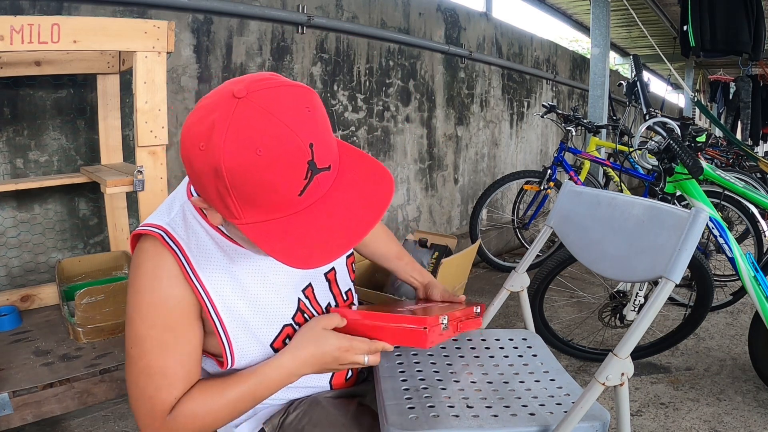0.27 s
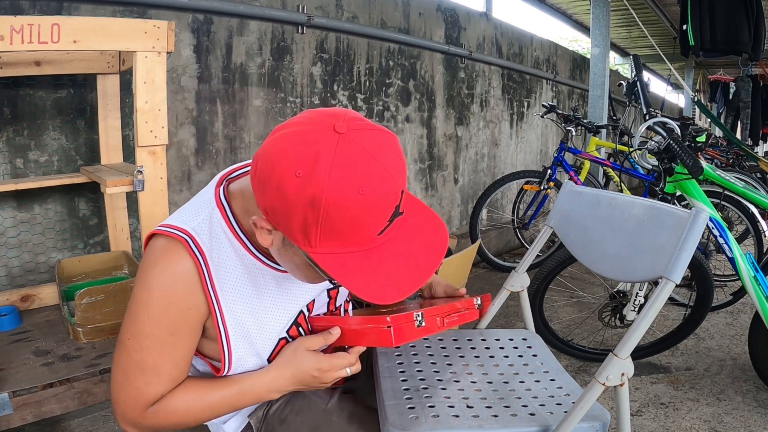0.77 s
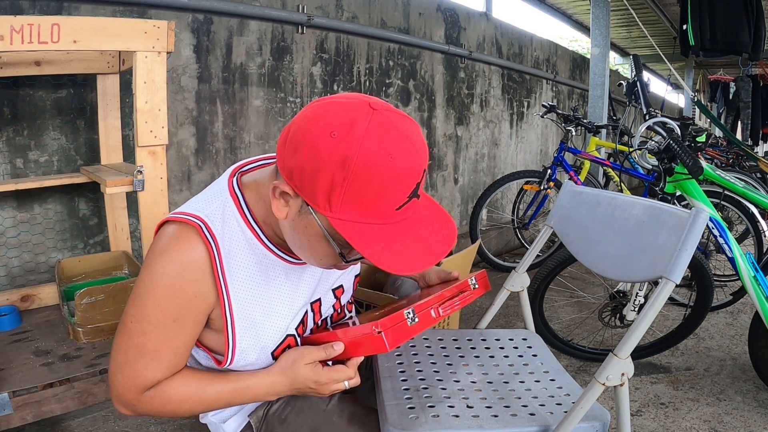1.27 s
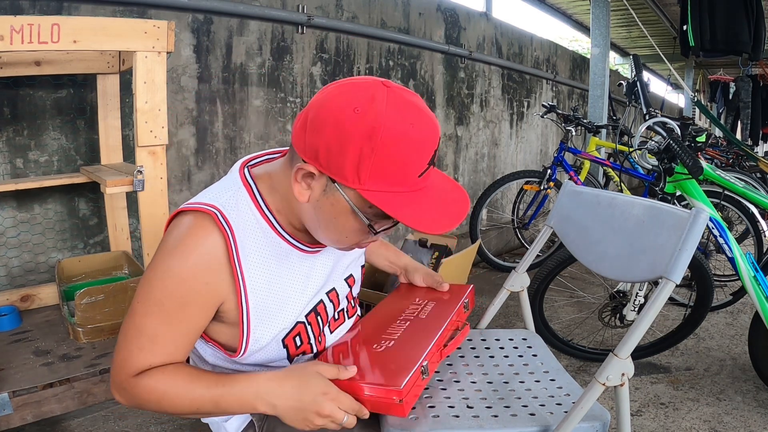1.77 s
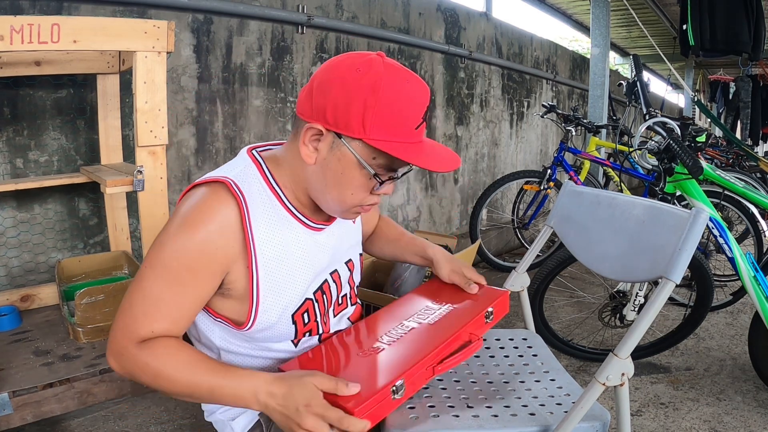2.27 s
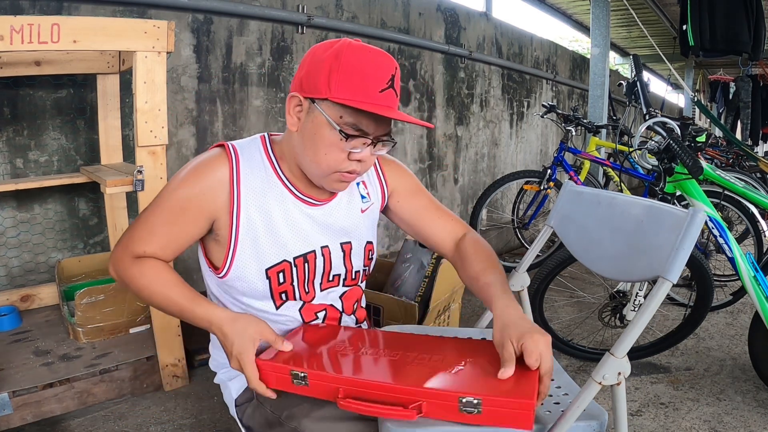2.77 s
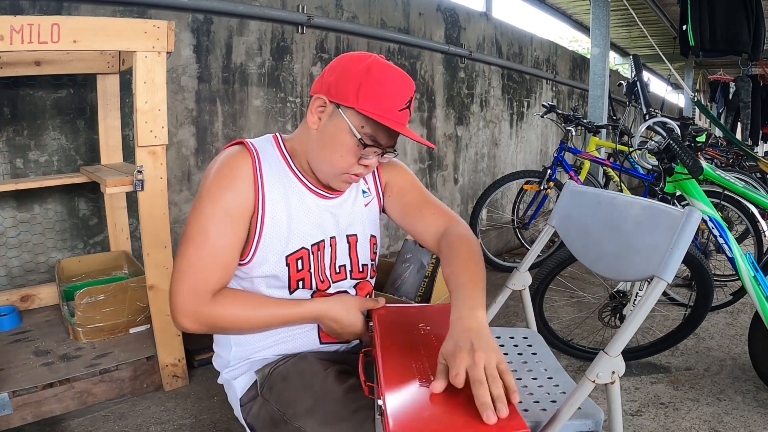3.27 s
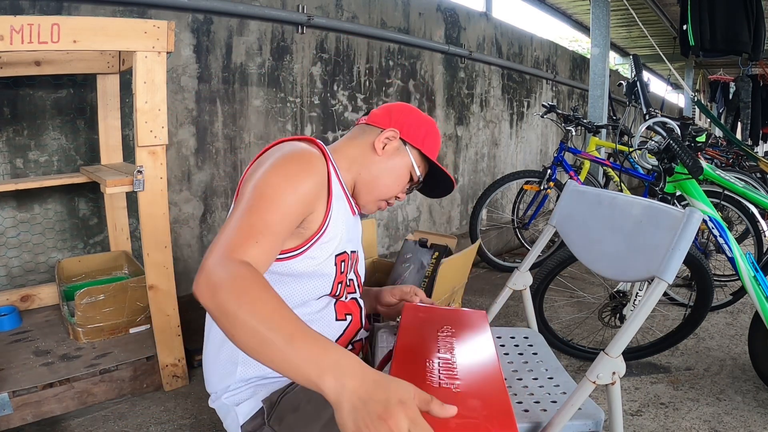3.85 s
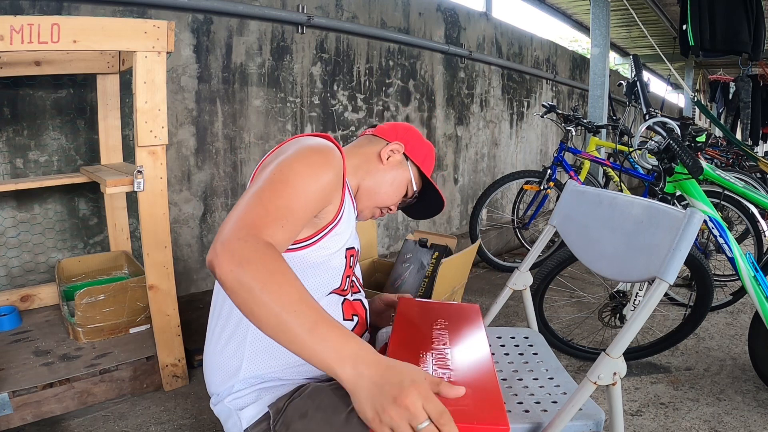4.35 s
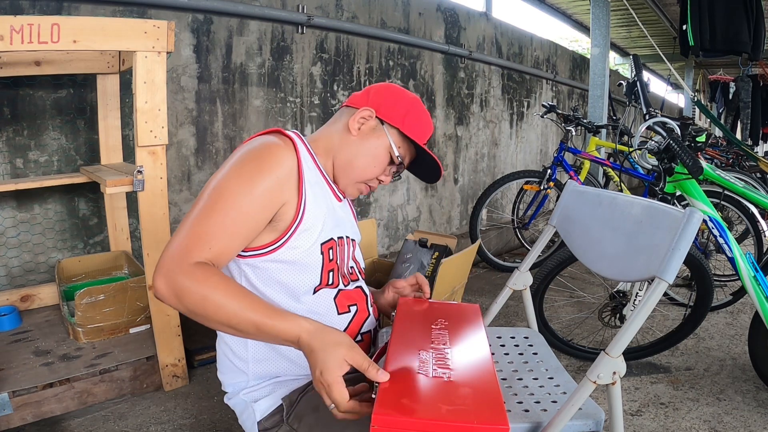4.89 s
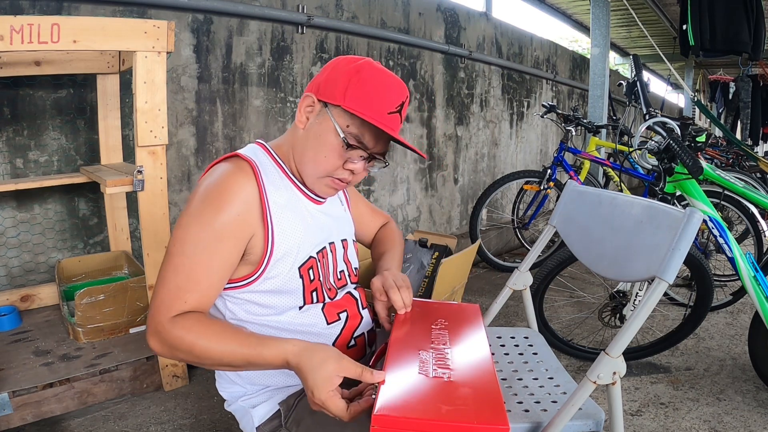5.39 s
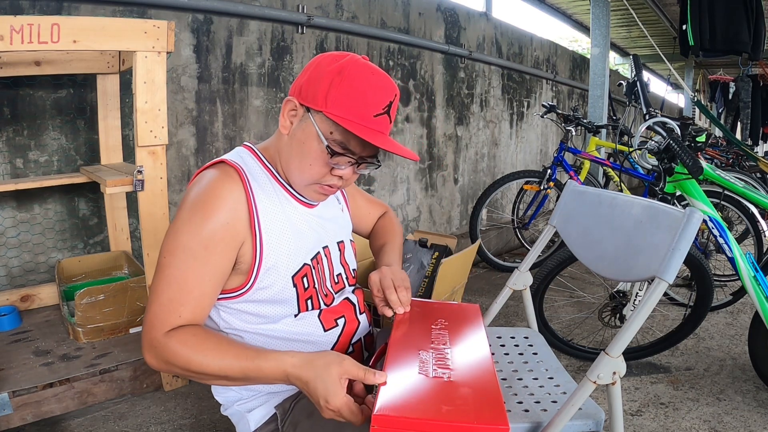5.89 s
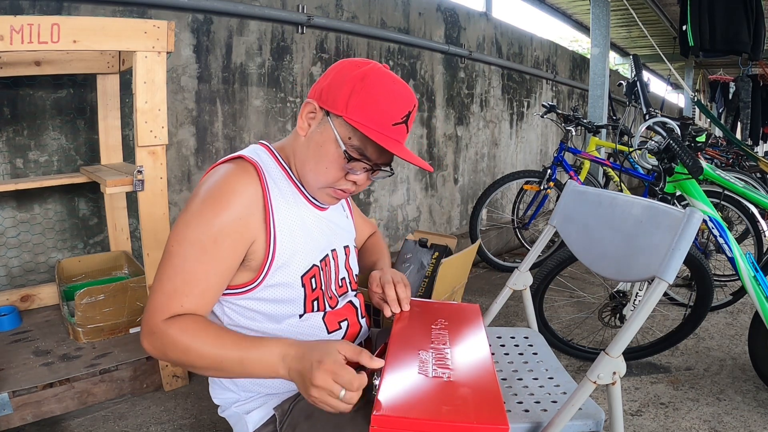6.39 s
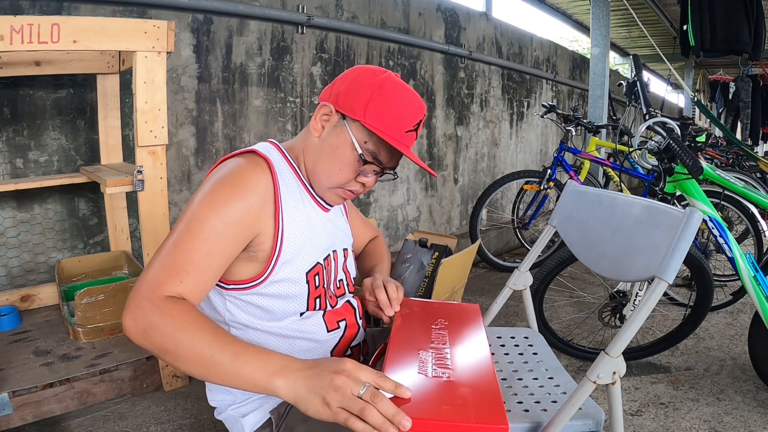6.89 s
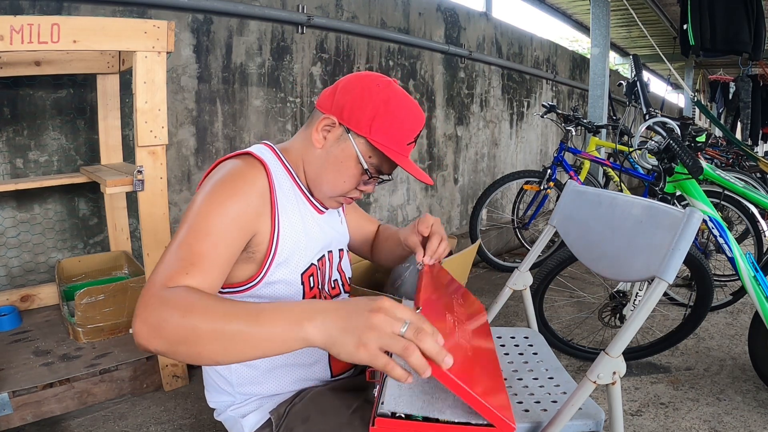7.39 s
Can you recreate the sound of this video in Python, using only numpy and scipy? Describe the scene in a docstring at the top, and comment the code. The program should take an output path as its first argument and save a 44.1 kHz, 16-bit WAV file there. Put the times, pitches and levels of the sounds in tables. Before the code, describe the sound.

A sheet-metal tool case is handled close by, each knock followed by a short rattle of steel tools inside. A quick cluster of clanks comes at 0.2 seconds, a loud one at 1.5 and another at 2.1, then lighter knocks. From about 2.7 to 3.2 seconds the case scrapes across a plastic seat, which gives a short hollow groan, strongest near 3.1. The loudest clatter comes around 3.5 seconds as the case settles. A small knock and a weaker groaning drag follow between 3.9 and 4.5. After a pause, two sharp metallic latch clacks sound at about 5.7 and 6 seconds. Soft knocks follow near 6.9, and a faint tap at 7.5. The place is a covered outdoor area with a short, slight echo. A low, throbbing machine drone and a dull wash of distant traffic continue throughout.

```python
"""Steel tool case on a plastic seat

A sheet-metal tool case is turned, set down, dragged and unlatched under an open roof. Each knock is
an impact and a short rattle of the steel tools inside, which excite the damped modes of panels and
tools. In dragging, stick-slip friction drives the resonances of the seat, and it groans.
Wall and roof return a short echo; a machine drones nearby over a dull city wash."""
import sys
import numpy as np
from scipy import signal
from scipy.fft import rfft, irfft
from scipy.io import wavfile
from scipy.ndimage import uniform_filter1d

SR = 44100
rng = np.random.default_rng(int(sys.argv[2]) if len(sys.argv) > 2 else 0)


def wrap_up_sound(samples):
    """Save the sound to the file named by the first command line argument, as 16-bit audio."""
    columns = np.atleast_2d(samples).T
    # keep every value between -1 and 1, then stretch to whole-number steps
    tamed = np.clip(columns, -1, 1)
    steps = np.round(tamed * 32767).astype(np.int16)
    wavfile.write(sys.argv[1], SR, steps)


N = 336924

# Impacts on the case: t/s, level/dB, relative thud, brightness and treble levels/dB, panel f/Hz,
# struck part f/Hz, contact rise/ms, rattle T60/s, relative rattle level/dB
KNOCKS = [(.12, -25, 11.5, -15, -33, 376, 2740, 1.4, 0.2, -21.5),
          (.2036, -8.5, 4, -7, -25, 396, 3350, 0.86, .23, -24.5),
          (0.2194, -9.5, -4, -6, -11.5, 456, 2920, 1.1, 0.14, -24),
          (.306, -21, 11, -9, -26, 390, 2600, 3.1, 0.19, -28.5),
          (1.5404, -3, 1.5, -5, -28, 501, 5000, 0.3, 0.34, -26.5),
          (1.5805, -13.5, 10.5, -9, -13, 620, 1750, 0.84, .38, -27),
          (1.597, -18, 14.5, -6, -25, 322, 2280, 4.5, 0.16, -21),
          (1.62, -22, 11.5, -9, -26, 370, 1570, 5, 0.17, -11.5),
          (1.657, -28, 15, -8, -26, 400, 2480, 3, 0.12, -15),
          (2.1195, -11, 7.5, -6, -15.5, 549, 2730, 2, 0.13, -16.5),
          (2.1402, -9.5, 3.5, -3, -10, 433, 2840, 2.4, 0.21, -21.5),
          (2.39, -37, 18, -8, -26, 904, 2500, .8, .18, -27),
          (2.4402, -24.5, 9.5, -15, -34, 440, 2740, 0.98, 0.38, -30),
          (2.523, -21.5, 3, -7, -38, 367, 3550, 3.4, 0.15, -20.5),
          (2.7408, -21.5, 11, -8, -19, 387, 2650, 1., 0.21, -17),
          (2.826, -21, -9, -4, -14.5, 455, 3600, 2.1, 0.52, -27),
          (2.9403, -16.5, -6, -8, -16, 473, 4100, 1.5, 0.051, -11),
          (3.3155, -20.5, 7.5, -11, -32, 586, 1940, 1.8, 0.34, -15),
          (3.337, -26, 3, -2, -14, 500, 5000, 4, 0.15, -12),
          (3.366, -24.5, 8, 0.5, -10, 424, 1280, 3.5, 0.095, -13.5),
          (3.4681, -13, 3.5, -3, -9, 350, 3200, 1.6, 0.29, -15),
          (3.4826, -2.5, -5, 1, -6, 727, 3830, 3.3, 0.18, -20.5),
          (3.498, -11, 4, -3, -5, 490, 2200, 2.7, 0.2, -21.5),
          (3.516, -3, -8, -1, -11.5, 420, 3370, 3, 0.19, -22),
          (3.535, -12, 1, 0, -16, 500, 4500, 6.1, 0.15, -27),
          (3.553, -15, 1, -11, -27, 700, 2200, 2.3, .25, -23),
          (3.9188, -21.5, 5, -11, -21, 1090, 2770, 0.88, 0.2, -20.5),
          (4.2772, -40, 19, -7, -1, 465, 1300, 2.9, .12, -37),
          (4.334, -28, 9.5, -8, -26, 477, 2000, 3.7, 0.23, -24),
          (5.66, -18.5, 2.5, -19, -19, 450, 3230, 7.7, 0.23, -15.5),
          (5.675, -5.5, -7, -4.5, -19.5, 684, 2760, 2.2, .16, -25.5),
          (5.985, -4, 3, -6.5, -14, 403, 2070, 2.3, 0.18, -19.5),
          (6.014, -12.5, 8.5, -2, -13, 520, 2800, 3, 0.26, -29.5),
          (6.034, -20, 6, -10, -24, 480, 3000, 2.6, .2, -32),
          (6.0817, -20.5, 10.5, -15, -38, 480, 1300, 0.98, 0.47, -27),
          (6.844, -20.5, 12.5, -14, -40, 485, 2380, 2, 0.086, -14.5),
          (6.88, -27.5, 5, -8, -14, 413, 3000, 2.4, 0.28, -22),
          (6.946, -18.5, 7.5, -12, -28, 480, 3140, 2.2, 0.18, -16),
          (7.079, -41, 20.5, -11, -21, 347, 1810, 1.3, .22, -25),
          (7.519, -35, 13, -9, -22, 342, 1500, .8, 0.12, -23)]


def knocks():
    """Linear response: each knock is the force of blow and rattle convolved with the case's response."""
    out, t = np.zeros((2, N + SR)), np.arange(int(.22 * SR)) / SR
    tumbling = undb(2 * walk(120))
    for s, db, thud_db, bright_db, treble_db, panel_hz, part_hz, rise_ms, t60, rattle_db in KNOCKS:
        i = int(s * SR)
        pan_db = .3 * rng.standard_normal() * np.array([[.5], [-.5]])
        response = case_response(t, thud_db, bright_db, treble_db, panel_hz, part_hz)
        force = blow(t, rise_ms) + undb(rattle_db) * np.resize(tumbling[i:], len(t)) * rattle(t, t60)
        out[:, i:i + 2 * len(t) - 1] += signal.fftconvolve(force, undb(db + pan_db) * response, axes=1)
    return out[:, :N]


def blow(t, rise_ms):
    """Contact force: the slower the contact, the weaker its click and the longer its chatter."""
    rise_s = rise_ms / 1000
    click = undb(-4.5 * rise_ms) * snap(t, 92, 9200)
    return click + crack(t, 88, 17000, t60=.022 + 6 * rise_s, rise_s=rise_s)


def rattle(t, t60):
    """Random collisions: loose tools land just after the blow, and the fine ticks settle first."""
    shared, left, right = (grains(len(t), per_s=9000, spread_db=2.2) for _ in range(3))
    coarse = band(shared, 100, 5000, order=1)
    # tools lie all along the case, so some ticks reach one side only
    one_sided = np.array([band(left, 4100, 15000), band(right, 4500, 15000)])
    fine = shared - coarse + undb(-4.5) * one_sided
    return rise(t, .0084) * decay(t, t60) * (coarse + decay(t, .3) * fine)


# Modes of the sheet-metal panels: f/Hz, relative level/dB, T60/s
PANEL_MODES = [(257, -13, 0.23), (297.7, 6.5, 0.2), (385, 7.5, 0.087), (456, 12, 0.061), (497, 1.5, 0.045),
               (700, 2.5, 0.051), (960, -17.5, 0.057), (998, 3.5, 0.12), (1190, -7.5, 0.024)]
# Modes of the sockets and bars: f/Hz, relative level/dB, T60/s
TOOL_MODES = [(1716, 3, 0.053), (1880, 12.5, 0.05), (2200, 8, 0.047), (2770, 9.5, .06), (3470, 5.5, 0.073),
              (3300, 1.5, 0.18), (4000, 5, 0.11), (5090, -1.5, 0.086), (5300, 6.5, 0.11),
              (6020, -11, 0.088), (6900, -17, .1), (7780, 1, .06), (8700, -3.5, .08), (9970, -6.5, 0.16),
              (10700, -13, .1), (11700, -11.5, .1)]


def case_response(t, thud_db, bright_db, treble_db, panel_hz, part_hz):
    """Modal superposition: panels give the lows of the impulse response, tools the highs."""
    tools = undb(-13) * ring(TOOL_MODES, t, spread_db=3)
    thud = snap(t, 206, 476) + undb(3.5) * snap(t, 614, 1270) + ring(PANEL_MODES, t, spread_db=2)
    thud += undb(-2.5) * snap(t, .823 * panel_hz, 1.037 * panel_hz)
    thud *= rise(t, .0019)  # the panels take a moment to swing
    middle = snap(t, 1470, 3310) + band(tools, 1000, 4000)
    middle += undb(-8.5) * snap(t, .868 * part_hz, 1.094 * part_hz)
    bright = snap(t, 3900, 6070) + undb(5.5) * band(tools, 3700, 5600)
    treble = snap(t, 6730, 9000) + undb(-9.5) * snap(t, 9300, 12500) + band(tools, 5500, 13000)
    body = undb(thud_db) * thud + middle + undb(bright_db) * bright + undb(treble_db) * treble
    # the case is wide, so its highs travel left and right by unlike paths
    side = undb(bright_db / 2 - 3) * crack(t, 1500, 4400, t60=.011)
    side += undb(treble_db - 2.5) * crack(t, 6000, 13000, t60=.015)
    return stereo(body, side)


# Touches that ring one panel or socket: t/s, f/Hz (the nearest mode sounds), relative level/dB
PINGS = [(.206, 460, -27), (.222, 5330, -41), (.246, 5090, -44), (1.478, 950, -36), (1.545, 510, -21),
         (1.581, 1000, -29), (1.586, 7780, -43), (1.652, 5090, -48), (1.664, 1000, -35), (1.672, 5090, -50),
         (2.122, 520, -18), (2.124, 2770, -31), (2.198, 5090, -46), (2.39, 950, -34), (2.744, 1200, -31),
         (2.942, 3950, -36), (3.105, 5090, -47), (3.317, 506, -27), (3.474, 5090, -29), (3.476, 6010, -31),
         (3.481, 700, -24), (3.483, 3950, -24), (3.486, 3500, -26), (3.497, 456, -26), (3.5, 5090, -31),
         (3.548, 1000, -32), (4.275, 950, -37), (5.676, 5090, -37), (5.679, 1690, -24), (5.987, 9970, -43),
         (5.99, 300, -23), (5.992, 1910, -27), (6.021, 9970, -45), (6.027, 5330, -39), (6.045, 5330, -42),
         (6.895, 5090, -48), (7.171, 3250, -50)]


def pings():
    """Damped vibration: a stuttering touch rings one mode as a cluster of three close frequencies."""
    out, t = np.zeros(N + SR), np.arange(int(.22 * SR)) / SR
    for s, near_hz, db in PINGS:
        hz, _, t60 = min(PANEL_MODES + TOOL_MODES, key=lambda mode: abs(mode[0] - near_hz))
        split_hz = (.01 * hz + 50) * rng.uniform(.6, 1)
        cluster = [(hz, 1), (hz + split_hz, .5), (hz - split_hz, .5)]
        pure = decay(t, t60) * sum(gain * np.sin(2 * np.pi * f * t) for f, gain in cluster)
        stutter = rng.standard_normal(len(t)) * decay(t, .04)
        rough = signal.fftconvolve(pure, stutter)[:len(t)]
        i = int(s * SR)
        out[i:i + len(t)] += undb(db) * unit(rough) * np.std(pure)
    return out[:N]


# Shoves: peak t/s, build-up/s, groan level/dB, upper mode level re groan/dB, scrape level/dB
SHOVES = [(2.755, 0.17, -42, -3, -37.5), (2.785, .04, -48, -3, -51.5), (2.82, 0.09, -46, -8, -58),
          (2.9, 0.052, -60, -9, -43.5), (2.955, .015, -41, 5, -43), (2.99, 0.037, -37, 3, -38),
          (3.02, .03, -34, 0, -50), (3.05, 0.038, -30, 0, -43), (3.072, 0.022, -22, -4, -44.5),
          (3.099, 0.033, -19.5, -8, -44), (3.138, .03, -41.5, 9, -53), (3.205, .018, -44, -1, -60),
          (3.25, 0.044, -55, 2, -60), (4.061, 0.034, -31, -13, -46.5), (4.105, 0.05, -36, -9, -59),
          (4.154, 0.078, -45, -1, -49), (4.278, 0.011, -34, -4.5, -45), (4.455, 0.057, -47, -7, -58)]
# Resonances of the hollow seat: f/Hz, bandwidth/Hz, relative level/dB
SEAT_MODES = [(450, 18.7, 9.5), (336, 94, -7.5), (763, 32, -12.5), (1030, 71, -12.5), (1437, 90, -21.5),
              (1746, 90, -23)]
# Spectrum of the scrape: f/Hz, relative spectral level/dB
SCRAPE_SPECTRUM = [(350, -18), (600, -8), (800, -9.5), (1040, 1), (1300, -11.5), (1600, -12.5), (2800, -16),
                   (5010, -26.5), (8000, -35), (14000, -56.5)]


def drags():
    """Stick-slip friction: tiny slips ring the seat and scratch the case as shoves build and slacken."""
    t = np.arange(N) / SR
    slips = grains(N, per_s=2500, spread_db=.53)
    groan = sum(undb(db) * resonance(slips, hz, width_hz) for hz, width_hz, db in SEAT_MODES)
    groan = steady(groan, size=2000)  # held at a steady level; the shoves shape its loudness
    upper_mode = steady(resonance(slips, hz=526, width_hz=24), size=2000)
    mid, side = (unit(colour(grains(N, per_s=2500, spread_db=1.8), SCRAPE_SPECTRUM)) for _ in range(2))
    scrape = stereo(mid, undb(-9) * band(side, 1500, 14000, order=1)) * undb(2.9 * walk(60))

    def shove(peak_s, rise_s, fall_db_per_s):
        building_db = 23 * (peak_s - t) / rise_s
        slackening_db = fall_db_per_s * (t - peak_s - .0079)  # after a brief hold
        return undb(-np.maximum(building_db, slackening_db).clip(0))

    out = np.zeros((2, N))
    for s, rise_s, groan_db, upper_db, scrape_db in SHOVES:
        seat = undb(groan_db) * (groan + undb(upper_db) * upper_mode)
        out += seat * shove(s, rise_s, fall_db_per_s=333)
        out += undb(scrape_db) * scrape * shove(s, rise_s, fall_db_per_s=161.5)
    return out


def echo(near):
    """Reverberation: dense reflections from wall and roof die away exponentially."""
    t = np.arange(int(.4 * SR)) / SR
    mid, side = rng.standard_normal((2, len(t))) * decay(t, t60=.26) * (t > .003)
    mid, side = band(mid, 230, 6600, order=1), band(side, 1200, 7000, order=1)
    tail = stereo(mid, side) / np.linalg.norm(mid)
    return signal.fftconvolve(near.mean(axis=0, keepdims=True), tail, axes=1)[:, :N]


# Weaker tones of the machine: f/Hz, level/dB, unsteady-to-steady ratio, rate of change/Hz
MACHINE_TONES = [(27.4, -38.5, 0.5, 11), (58.25, -38, 1.8, 20), (112.5, -38, 0.83, 18),
                 (152.8, -43.5, 1.4, 22), (173.6, -41, 2.8, 22), (698, -60, 1.6, 23)]
# Irregular chance rises and dips in the loudness of the low hum: t/s, level/dB
HUM_LEVEL = [(0.0, -33.5), (0.42, -21.5), (0.47, -26.5), (1.23, -26), (1.27, -33), (1.49, -22),
             (2.1, -20.5), (2.15, -29), (2.72, -27.5), (2.76, -40), (2.91, -28.5), (3.38, -25),
             (3.44, -33.5), (3.53, -25), (3.85, -34), (3.91, -19.5), (4.06, -46), (4.14, -27.5),
             (5.01, -28), (5.06, -46), (5.19, -24), (5.27, -38), (5.48, -23.5), (5.55, -36), (6.01, -23),
             (6.23, -39), (6.29, -21.5), (6.89, -25), (6.99, -37), (7.05, -26), (7.61, -23), (7.63, -26)]


def drone():
    """Random modulation: the tones of a running machine throb in amplitude and waver in phase."""
    t = np.arange(N) / SR

    def tone(hz, unsteady, per_s):
        phasor = 1 + unsteady * (walk(per_s) + 1j * walk(per_s))
        return unit(np.imag(phasor * np.exp(2j * np.pi * hz * t)))

    hum_gain = undb(np.interp(t, *np.transpose(HUM_LEVEL)))
    hum = hum_gain * steady(tone(hz=93.9, unsteady=.9, per_s=17), size=6000)
    return hum + sum(undb(db) * tone(hz, unsteady, per_s) for hz, db, unsteady, per_s in MACHINE_TONES)


# Spectrum of distant traffic and air: f/Hz, relative spectral level/dB
CITY_SPECTRUM = [(12, -28.5), (31, -29), (42, -17.5), (80, -6), (100, -10), (130, -18), (175, -16),
                 (215, -23), (270, -23), (371, -29.5), (764, -40), (950, -37.5), (3150, -50), (5450, -56),
                 (15000, -88)]
# Its stereo width: f/Hz, side level re mid/dB
CITY_WIDTH = [(60, -30.5), (110, -24), (200, -22), (380, -18), (700, -7), (1290, -7.5), (2380, -5),
              (4390, -2), (8110, 0), (15000, -6)]


def city_wash():
    """Diffuse field: traffic and air noise is coherent left to right in the bass, wide in the treble."""
    mid, side = (unit(colour(rng.standard_normal(N), CITY_SPECTRUM)) for _ in range(2))
    return undb(-32 + walk(2.025)) * stereo(mid, colour(side, CITY_WIDTH))


def ring(modes, t, spread_db):
    """Damped modes, weighted anew by each point of impact and slightly detuned; energy 1."""
    hz, db, t60 = np.transpose(modes)[:, :, None]
    weight, detune, _ = rng.standard_normal((3, len(hz), 1))
    partials = np.sin(2 * np.pi * hz * (1 + .0053 * detune) * t) * decay(t, t60)
    out = np.sum(undb(db + spread_db * weight) * partials, axis=0)
    return out / np.linalg.norm(out)


def snap(t, lo_hz, hi_hz):
    """Modal overlap: the impulse response of a band of modes too dense to resolve; energy 1."""
    out = band(1. * (t == 0), lo_hz, hi_hz, order=3)
    return out / np.linalg.norm(out)


def crack(t, lo_hz, hi_hz, t60, rise_s=.00065):
    """Exponentially damped burst of band noise; energy 1."""
    out = band(rng.standard_normal(len(t)) * rise(t, rise_s) * decay(t, t60), lo_hz, hi_hz)
    return out / np.linalg.norm(out)


def grains(size, per_s, spread_db):
    """Shot noise: tiny impacts at random moments, a few stronger than the rest; rms 1."""
    hit = rng.random(size) < per_s / SR
    return unit(hit * rng.choice([-1., 1.], size) * undb(spread_db * rng.exponential(size=size)))


def walk(per_s):
    """Slow fluctuation: random steps, smoothed twice."""
    hold = int(SR / per_s)
    steps = np.repeat(rng.standard_normal(N // hold + 1), hold)
    return uniform_filter1d(uniform_filter1d(steps, hold), hold)[:N]


def resonance(x, hz, width_hz):
    """Two resonators in series, the wider steepening the skirts; gain 1 at the centre."""
    for width in (width_hz, 3 * width_hz):
        x = signal.lfilter(*signal.iirpeak(hz, hz / width, SR), x)
    return x


def band(x, lo_hz, hi_hz, order=2):
    """Causal band-pass."""
    return signal.sosfilt(signal.butter(order, [lo_hz, hi_hz], "band", fs=SR, output="sos"), x)


def colour(x, points):
    """Spectral shaping through (f/Hz, level/dB) points."""
    hz, db = np.transpose(points)
    f = np.arange(1, len(x) // 2 + 2) * SR / len(x)
    return irfft(rfft(x) * undb(np.interp(np.log(f), np.log(hz), db)), len(x))


def steady(x, size):
    """Holds the running rms over size samples near 1."""
    return x / np.sqrt(uniform_filter1d(x ** 2, size=size))


def rise(t, rise_s):
    return 1 - np.exp(-t / rise_s)


def decay(t, t60):
    return 1000 ** (-t / t60)


def stereo(mid, side):
    return np.array([mid + side, mid - side])


def undb(db):
    return 10 ** (np.asarray(db) / 20)


def unit(x):
    return x / np.sqrt(np.mean(x ** 2))


def scene():
    """Superposition: the direct sound of case and seat, its echo, the city and the machine."""
    near = knocks() + drags() + pings()
    return near + undb(-17.5) * echo(near) + city_wash() + drone() * undb([[.2], [-.2]])


def record(dry):
    """Soft saturation rounds the peaks and a low-pass cuts the top; the left channel lags one sample."""
    channels = np.array([np.append(0, dry[0, :-1]), dry[1]])
    rounded = np.tanh(1.562 * channels) / 1.505
    return signal.sosfilt(signal.ellip(8, .2, 70, 14800, fs=SR, output="sos"), rounded)


dry = scene()
out = record(dry)
wrap_up_sound(out)
```